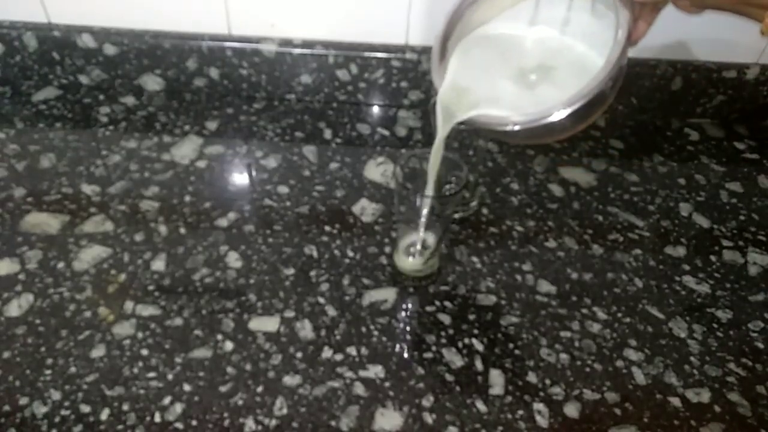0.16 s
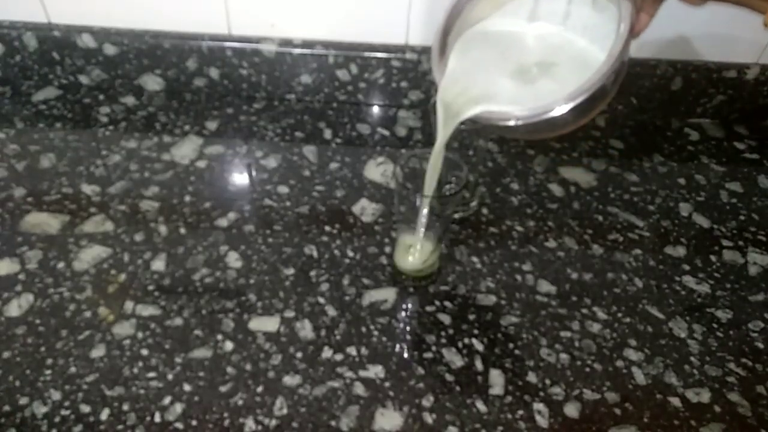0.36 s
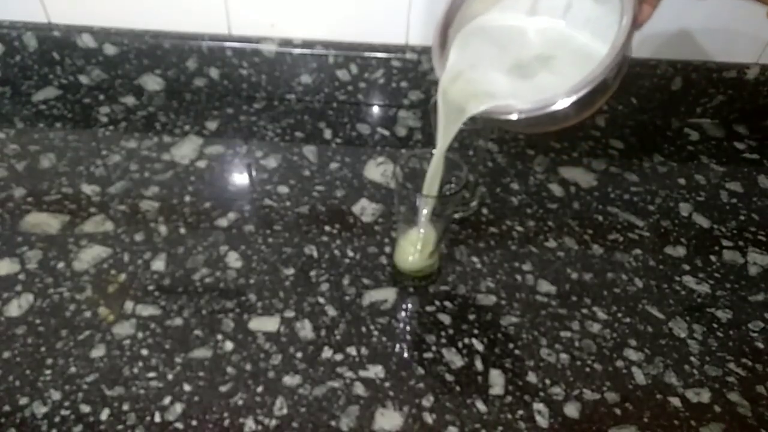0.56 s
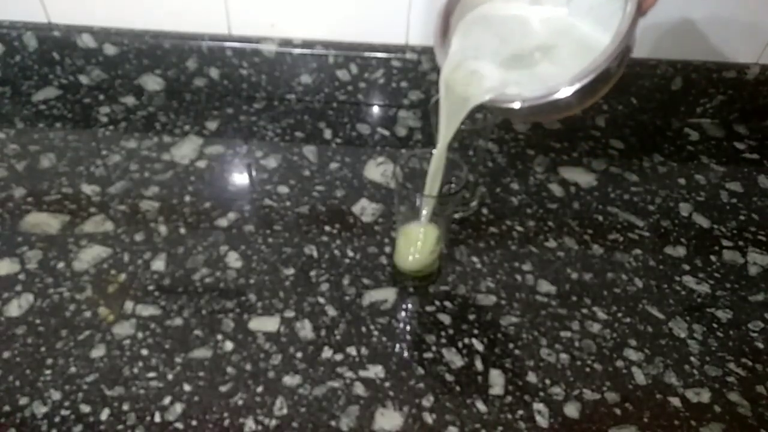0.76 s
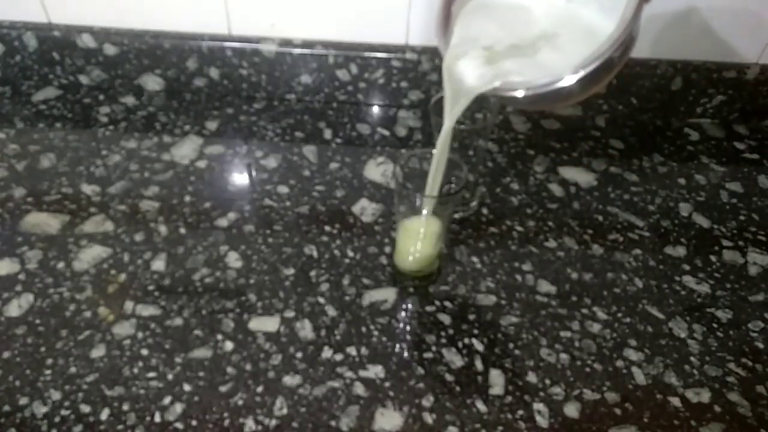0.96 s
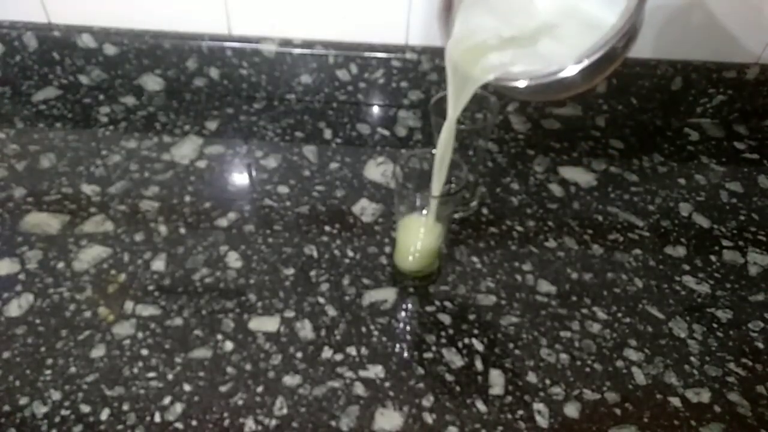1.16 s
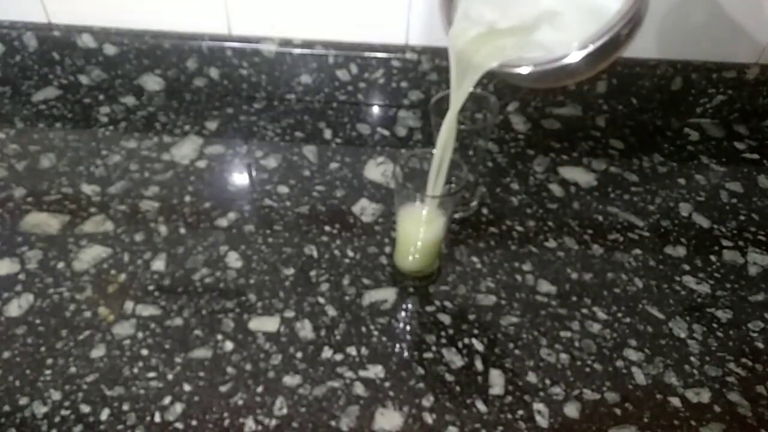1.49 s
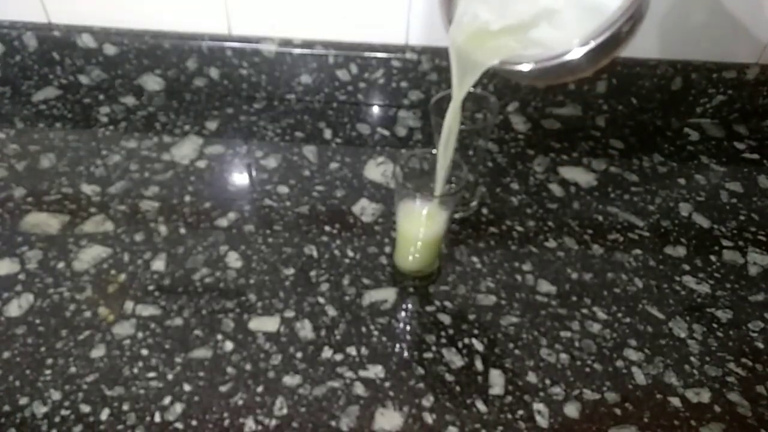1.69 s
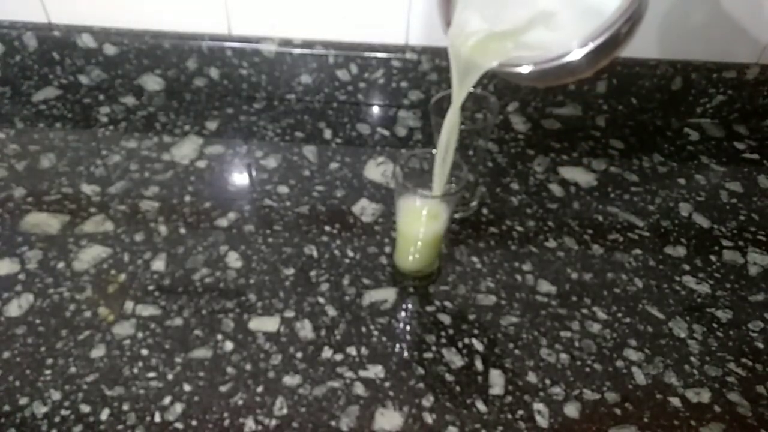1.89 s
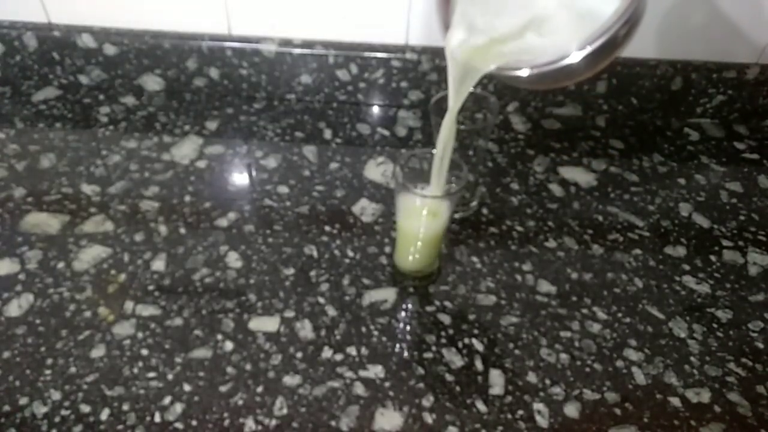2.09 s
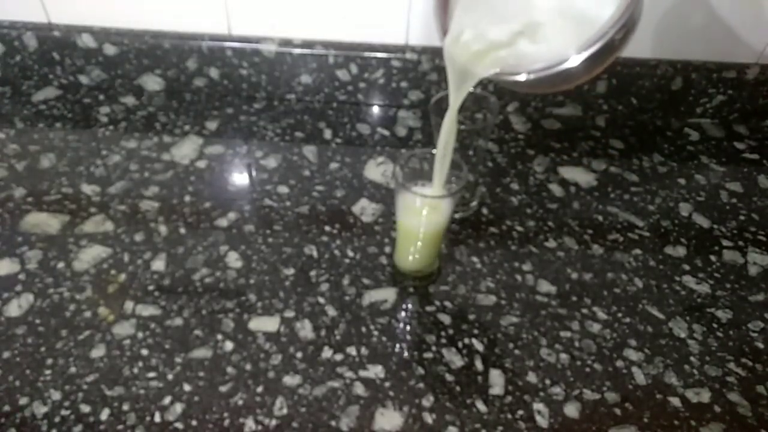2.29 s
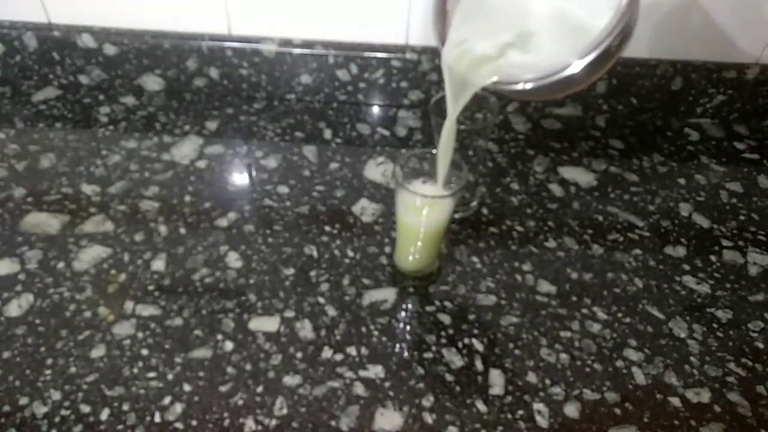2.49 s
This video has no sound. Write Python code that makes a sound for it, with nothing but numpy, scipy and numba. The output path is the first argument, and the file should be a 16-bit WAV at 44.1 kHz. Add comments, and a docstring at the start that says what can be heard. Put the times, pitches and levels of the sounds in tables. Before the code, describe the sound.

Juice pours in a thin stream into a narrow glass, bubbling and rising in pitch as it fills

```python
"""Juice pours in a thin stream into a narrow drinking glass on a kitchen counter.
Bursting bubbles, as swarms of short sines, ring the air column above the juice: moving band-passes whose
pitch climbs overall as the glass fills. Finer bubbles spray and fizz, and under foam the spray's ring widens.
Single bubbles pop and plop, big ones glug and low thuds come through the counter. A hard kitchen corner
rings and a short tail follows; rumble and room tone, both filtered noise, lie beneath."""
import sys
import numpy as np
from scipy import signal
from scipy.fft import rfft, irfft
from scipy.io import wavfile
from scipy.ndimage import uniform_filter1d
from numba import njit

SR = 44100
rng = np.random.default_rng(int(sys.argv[2]) if len(sys.argv) > 2 else 0)


def pcm_store(signal):
    """Save signal as 16-bit PCM."""
    levels = np.round(np.clip(np.atleast_2d(signal), -1, 1) * 32767)
    wavfile.write(sys.argv[1], SR, levels.astype(np.int16).T)


N = 116865


def undb(db):
    """Decibels to amplitude."""
    return 10 ** (np.asarray(db) / 20)


def curve(rows, axis=1, outside=None):
    """A table column joined by straight lines in time; beyond its ends it holds, or takes outside."""
    rows = np.array(rows, float)
    return np.interp(np.arange(N) / SR, rows[:, 0], rows[:, axis], outside, outside)


def steady(x, size=11025):
    """Slow level evened out to rms 1 over a window of size samples; the grain stays."""
    return x / np.sqrt(uniform_filter1d(x ** 2, size=size) + 1e-18)


@njit
def svf(x, hz, width):
    """State-variable band-pass whose centre and width may move; gain 1 at the centre."""
    y = np.empty(len(x))
    band_state, low_state = 0., 0.
    for i in range(len(x)):
        g = np.tan(np.pi * hz[i] / SR)
        damping = width[i] / hz[i]
        v = (band_state + g * (x[i] - low_state)) / (1 + g * (g + damping))
        band_state = 2 * v - band_state
        low_state += 2 * g * v
        y[i] = damping * v
    return y


def band(x, hz, width_hz):
    """Band-pass with fixed or moving centre and width."""
    return svf(x, hz + np.zeros(N), width_hz + np.zeros(N))


@njit
def ring(start, hz, cycles, size, glide, rise):
    """Bubbles: sines that swell, then decay at 60 dB per given cycle count while sliding up in pitch."""
    y = np.zeros(N)
    for j in range(len(start)):
        first = int(start[j])
        n = cycles[j] * SR / hz[j]  # length in samples, swell included
        phase = 0.
        for i in range(min(int(n), N - first)):
            phase += 2 * np.pi * hz[j] * (1 + glide * i / n) / SR
            swell = np.sin(np.pi / 2 * min(i / (rise * n), 1.)) ** 2
            decay = 1000. ** (-max(i / n - rise, 0.))
            y[first + i] += size[j] * np.sin(phase) * decay * swell
    return y


def swarm(low_hz, high_hz, cycles, spread_db, count):
    """Bubbles at random moments and pitches, some louder than the rest."""
    when, pitch, length, loudness = rng.random((count, 4)).T
    size = undb(-spread_db * np.log(1 - .99 * loudness))
    hz = low_hz * (high_hz / low_hz) ** pitch
    return ring(when * N, hz, cycles * (.5 + length), size, 0.056, 0.3)


def typed(rows, cycles, glide, rise):
    """Single bubbles or knocks at the moments, peaks and starting pitches of a table."""
    rows = np.array(rows, float)
    return ring(rows[:, 0] * SR, 1. * rows[:, 2], cycles + 0 * rows[:, 0], undb(rows[:, 1]), glide, rise)


def rumble():
    """Dull rumble through the counter: noise in a low band."""
    # rumble at the counter: start_s, level_db
    rumble_levels = [(0.0, -103), (0.02, -81.5), (0.18, -78), (1.33, -76.5), (1.5, -69), (1.71, -77.5),
                     (1.81, -68.5), (1.83, -75), (2.57, -78), (2.65, -82)]
    low = band(band(rng.standard_normal(N), 80, 130), 80, 130)
    return steady(low) * undb(curve(rumble_levels))


def hush():
    """Quiet room tone: noise shaped by a spectrum."""
    # relative spectrum of the room tone: pitch_hz, level_db per Hz
    tone_spectrum = np.array([(15, -37), (25, -21), (102, -5), (428, -0.5), (658, -14), (1520, -16.5),
                              (2450, -24), (4040, -19.5), (7520, -24), (9780, -81), (16500, -120)])
    level_db = -77.5  # rms ahead of the microphone
    log_hz = np.log(np.maximum(np.arange(N // 2 + 1) * SR / N, 1))
    shape = undb(np.interp(log_hz, np.log(tone_spectrum[:, 0]), tone_spectrum[:, 1]))
    x = irfft(rfft(rng.standard_normal(N)) * shape, N)
    return x / x.std() * undb(level_db)


def column():
    """The splash rings the shrinking air column and its overtone, over a broad splash."""
    # ring of the air column, before a 7 dB cut: start_s, level_db
    column_levels = [(0.239, -53.5), (0.283, -43.5), (0.393, -49), (0.645, -37), (0.691, -43.5),
                     (0.739, -37), (0.797, -46), (0.951, -38.5), (0.985, -44.5), (1.039, -36), (1.137, -43),
                     (1.147, -38.5), (1.315, -38.5), (1.431, -44), (1.445, -39.5), (1.5, -59),
                     (1.52, -52.5), (1.67, -47.5), (1.96, -56.5), (2.066, -54.5), (2.332, -59.5),
                     (2.48, -62), (2.65, -77)]
    # pitch of the air column as the glass fills: start_s, lowest_hz, overtone_hz
    fill_pitches = [(0.2, 808, 1880), (0.45, 778, 1896), (0.7, 856, 1960), (0.9, 904, 2100),
                    (1.2, 952, 2135), (1.42, 1045, 2260), (1.55, 1199, 2460), (1.9, 1180, 2290),
                    (2.2, 1326, 2290), (2.4, 1400, 2200), (2.5, 1514, 2120)]
    # middle of the splash, before cuts of 1.5 and 7 dB: start_s, broad_splash_db, overtone_db
    splash_levels = [(0.12, -84, -69.5), (0.17, -84, -50), (0.21, -70.5, -70.5), (0.29, -48.5, -53),
                     (0.47, -62.5, -48), (1.23, -50, -53.5), (1.45, -56.5, -54.5), (1.5, -62, -73),
                     (1.65, -59.5, -65.5), (1.67, -65, -93.5), (1.84, -60.5, -77.5), (1.9, -66, -77.5),
                     (2.09, -66, -76.5), (2.12, -75, -81), (2.14, -62.5, -62.5), (2.42, -67.5, -106),
                     (2.62, -70.5, -81), (2.65, -98, -89)]
    column_width, overtone_width = .12, 0.29  # width of the last filter in each chain, share of pitch
    # second strand while the juice is shallow; level against the main ring
    shallow_hz, shallow_width_hz, shallow_db, shallow_until_s = 958, 35, -2, 0.7

    hz, high = curve(fill_pitches), curve(fill_pitches, axis=2)
    splash = swarm(610, 3050, 8.73, 2.6, count=4500)
    main = band(band(band(splash, hz, 0.4 * hz), hz, 0.98 * hz), hz, column_width * hz)
    fade = np.clip((shallow_until_s - np.arange(N) / SR) / .15, 0, 1)
    shallow = band(band(splash, shallow_hz, 200), shallow_hz, shallow_width_hz)
    main = steady(main, size=4000) + fade * undb(shallow_db) * steady(shallow)
    broad = band(band(splash, 1654, 900), 1640, 1000)
    over = band(band(splash, high, 0.24 * high), high, overtone_width * high)
    return (main * undb(curve(column_levels, outside=-120) - 7)
            + steady(broad) * undb(curve(splash_levels, outside=-120) - 1.5)
            + steady(over) * undb(curve(splash_levels, axis=2, outside=-120) - 7))


def spray():
    """Small bubbles ring across the glass, in a wider band under foam; finer ones fizz above."""
    # ring across the glass, before a 2.5 dB cut: start_s, level_db
    across_levels = [(0.124, -65), (0.142, -66.5), (0.306, -43.5), (0.356, -54.5), (0.38, -35.5),
                     (0.392, -48.5), (0.54, -59), (0.552, -54), (0.582, -49), (0.954, -60), (0.996, -49.5),
                     (1.124, -64.5), (1.166, -51), (1.17, -53), (1.408, -52), (1.5, -66.5), (1.52, -63),
                     (1.638, -62), (1.756, -66.5), (1.77, -62.5), (1.856, -69), (2.186, -66), (2.25, -77.5),
                     (2.274, -59), (2.346, -84), (2.384, -65.5), (2.39, -79), (2.466, -64.5), (2.548, -83),
                     (2.58, -60), (2.59, -95), (2.618, -62.5), (2.624, -96), (2.65, -95)]
    # fizz by bubble size: start_s, coarse_db, middle_db, fine_db
    fizz_levels = [(0.124, -103, -68, -70.5), (0.162, -65.5, -58, -63.5), (0.314, -50, -53.5, -57),
                   (0.544, -62.5, -66.5, -70), (0.552, -44.5, -55.5, -63.5), (0.632, -56, -57.5, -58.5),
                   (0.644, -43.5, -52.5, -55), (0.66, -50, -55.5, -61), (0.858, -61.5, -64.5, -69.5),
                   (0.99, -61.5, -60.5, -70.5), (0.994, -59.5, -64.5, -44), (1.178, -57.5, -58.5, -72.5),
                   (1.23, -53, -56, -57.5), (1.4, -58, -64, -67.5), (1.414, -56, -55, -55),
                   (1.5, -80.5, -66, -70.5), (1.52, -80, -81, -84), (1.564, -75, -83, -82),
                   (1.608, -66, -66.5, -84), (1.704, -78.5, -78.5, -96.5), (1.784, -74.5, -78, -78.5),
                   (1.95, -77, -80, -86.5), (2.124, -74.5, -79, -74.5), (2.382, -81, -108, -84),
                   (2.398, -82, -85, -103), (2.48, -75, -75.5, -76), (2.516, -77, -82, -102),
                   (2.57, -88, -90, -103), (2.576, -74.5, -87, -78.5), (2.65, -92, -93, -103)]
    # borders between the coarse, middle and fine fizz: pitch_hz
    fizz_edges = [3646, 4984, 6110, 6760]
    across_hz, across_width_hz = 2960, 440
    foam_s, foamed_hz, foamed_width_hz = 1.6, 3230, 900
    skirt_db = -14  # unfiltered bubbles mixed in beside the ring

    small = swarm(2646, 4070, 12., 3.4, count=3000)
    foam = np.arange(N) > foam_s * SR
    hz = np.where(foam, foamed_hz, across_hz)
    rung = band(small, hz, np.where(foam, foamed_width_hz, across_width_hz))
    across = steady(rung + undb(skirt_db) * small) * undb(curve(across_levels, outside=-120) - 2.5)
    fizz = 0
    for k, (low, high) in enumerate(zip(fizz_edges, fizz_edges[1:])):
        grain = steady(swarm(low, high, 18.3, 2.0, count=4000))
        fizz = fizz + grain * undb(curve(fizz_levels, axis=k + 1, outside=-120))
    return across + fizz


def thuds():
    """Dull knocks through the counter, each of two decaying modes."""
    # lower mode of each thud, dry: start_s, peak_db, pitch_hz
    thud_rows = [(0.144, -64, 167), (0.173, -61.5, 170), (0.208, -63.5, 168), (0.261, -55.5, 164.7),
                 (0.29, -61, 170.5), (0.371, -55, 175), (0.406, -61, 165), (0.826, -61, 277),
                 (0.95, -62, 248), (1.067, -64.5, 190), (1.128, -63.5, 241), (1.246, -57, 228),
                 (1.317, -57.5, 173.4), (1.429, -62, 185), (1.514, -60, 158), (1.975, -61, 170),
                 (2.048, -63, 160)]
    upper_ratio, upper_db = 1.447, -5  # upper mode against the lower
    upper = np.array(thud_rows) * [1, 1, upper_ratio] + [0, upper_db, 0]
    return typed(thud_rows, 14.1, 0.017, 0.25) + typed(upper, 11, 0.017, .3)


def pops():
    """Loud single bubbles: high sines that slide up as they die."""
    # single bubbles, dry: start_s, peak_db, pitch_hz
    pop_rows = [(0.1466, -41.5, 5820), (0.2219, -41.5, 3120), (0.2394, -37, 2990), (0.2713, -32, 2950),
                (0.2912, -33.5, 3040), (0.3341, -34, 3940), (0.3641, -31, 2894), (0.3785, -31, 3000),
                (0.5531, -26.5, 3204), (0.6444, -31.5, 3950), (0.7567, -35, 3880), (0.9243, -41, 4290),
                (1.1473, -38.5, 2630), (1.1613, -37, 2840), (1.2331, -33, 4610), (1.3034, -43, 2810),
                (1.3653, -46, 2710), (1.5903, -48.5, 3530), (0.9971, -38.5, 5840), (1.1947, -40, 6230),
                (1.4132, -40, 6200)]
    return typed(pop_rows, cycles=28.7, glide=0.13, rise=0.24)


def plops():
    """Single bubbles in the air column: lower sines that slide up as they die."""
    # plops, dry: start_s, peak_db, pitch_hz
    plop_rows = [(0.162, -50.5, 1440), (0.238, -53, 980), (0.293, -40, 1283), (0.307, -47, 1280),
                 (1.523, -45.5, 1165), (1.538, -50, 1160), (1.574, -45, 1096), (1.608, -54, 1195),
                 (1.629, -50.5, 1090), (1.645, -45.5, 1187), (1.7, -50, 1140), (1.712, -47.5, 1135),
                 (1.734, -44, 1204), (1.74, -46, 1157), (1.814, -41, 1300), (1.826, -36, 1216),
                 (1.832, -41.5, 1103), (1.848, -47.5, 1245), (1.873, -45.5, 1093), (1.879, -46, 1220),
                 (1.896, -59, 1110), (1.92, -61, 1154), (1.936, -53, 1186), (1.966, -46.5, 1190),
                 (1.976, -45.5, 1293), (1.994, -44.5, 1223), (2.044, -43.5, 1310), (2.069, -50.5, 1146),
                 (2.081, -47, 1170), (2.096, -50, 1250), (2.273, -45.5, 1250), (2.282, -50.5, 1167),
                 (2.309, -51, 1350), (2.348, -45, 1350), (2.371, -41.5, 1456), (2.389, -48, 1320),
                 (2.412, -49, 1314), (2.448, -53, 1440), (2.478, -49.5, 1460), (2.488, -60, 1590)]
    return typed(plop_rows, cycles=21.3, glide=0.12, rise=0.18)


def glug():
    """Big slow bubbles under the juice surface, in a band that wanders in pitch."""
    # glug, before a 1.5 dB cut: start_s, level_db, pitch_hz
    glug_rows = [(0.4, -77, 640), (0.46, -70.5, 669), (0.56, -44.5, 590), (0.61, -59.5, 545),
                 (0.64, -51, 496), (0.87, -64.5, 607), (1.01, -61, 648), (1.11, -71, 616),
                 (1.3, -55.5, 573), (1.36, -59.5, 540), (1.52, -67, 496), (1.57, -70.5, 506),
                 (1.63, -57.5, 473), (1.67, -68.5, 490), (1.7, -74.5, 508), (1.78, -56.5, 453),
                 (1.95, -82.5, 480), (2.22, -73, 436), (2.27, -69.5, 628), (2.32, -81, 557),
                 (2.41, -74.5, 450), (2.65, -86.5, 543)]
    hz = curve(glug_rows, axis=2)
    big = band(band(swarm(391, 704, 7.84, 0.61, count=500), hz, 170), hz, 87)
    return steady(big, size=1800) * undb(curve(glug_rows, outside=-120) - 1.5)


def kitchen(x):
    """Narrow resonances of the hard corner and a short diffuse tail of decaying noise."""
    # ring of the kitchen corner, before the common gain: pitch_hz, level_db
    corner_modes = [(732, -2), (777, 2.5), (891, 4.5), (936, -2.5), (1000, 3.5), (1047, -9), (1085, 5.5),
                    (1148, 6.5), (1182, 4.5), (1215, -1.5), (1297, -3.5), (1350, 6), (1430, -23),
                    (1548, -4)]
    corner_db, corner_width_hz = 3, 10.3  # common gain and width of the modes
    room_db, room_t60_s = -5, 0.26
    t = np.arange(SR // 2) / SR
    tail = rng.standard_normal(len(t)) * 1000. ** (-t / room_t60_s) * (t > .003)
    wet = signal.fftconvolve(x, tail / np.sqrt(np.sum(tail ** 2)))[:N]
    corner = sum(undb(db) * band(x, hz, corner_width_hz) for hz, db in corner_modes)
    return x + undb(room_db) * wet + undb(corner_db) * corner


def scene():
    """The pour heard in the kitchen, over rumble and room tone."""
    singles = pops() + plops() + thuds()
    pour = column() + spray() + glug() + singles
    return (kitchen(pour) + rumble() + hush())[None]


def record(dry):
    """The microphone rolls off at both ends, then cuts the top steeply."""
    low_cut_hz, roll_hz, top_hz = 45, 6600, 7550
    rolloff = signal.butter(4, [low_cut_hz, roll_hz], "bandpass", fs=SR, output="sos")
    soft = signal.sosfilt(rolloff, dry)
    return signal.sosfilt(signal.ellip(8, .5, 60, top_hz, fs=SR, output="sos"), soft)


dry = scene()
out = record(dry)
pcm_store(out)
```